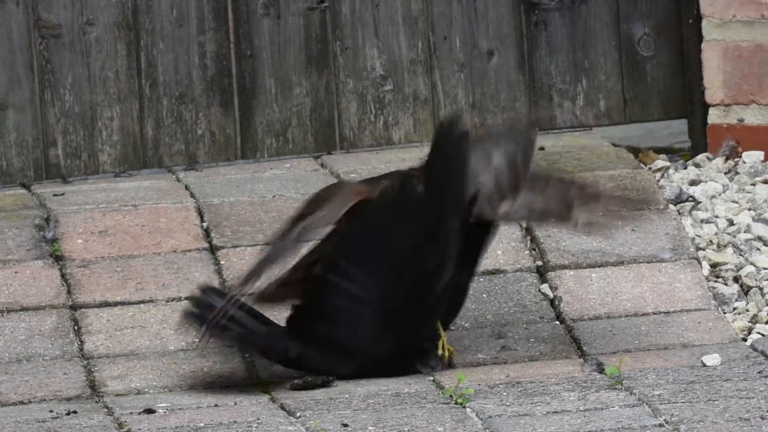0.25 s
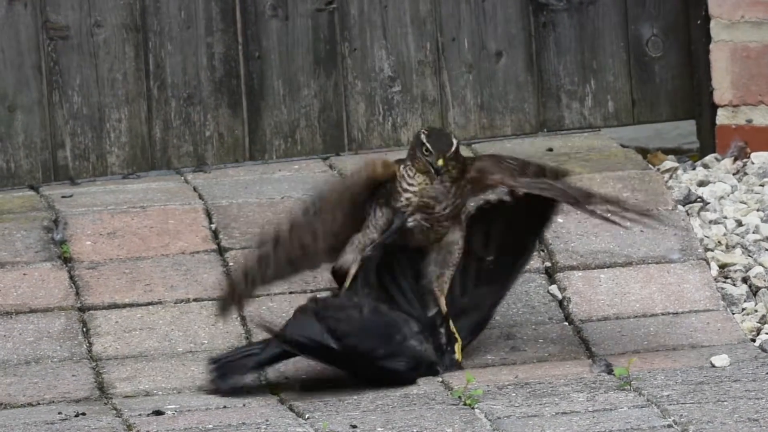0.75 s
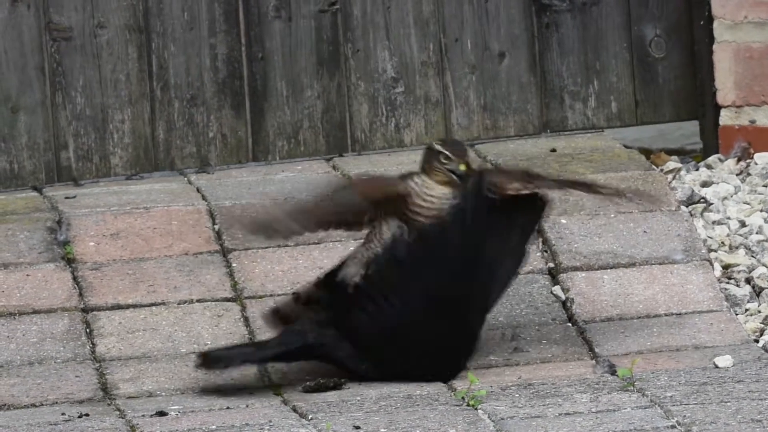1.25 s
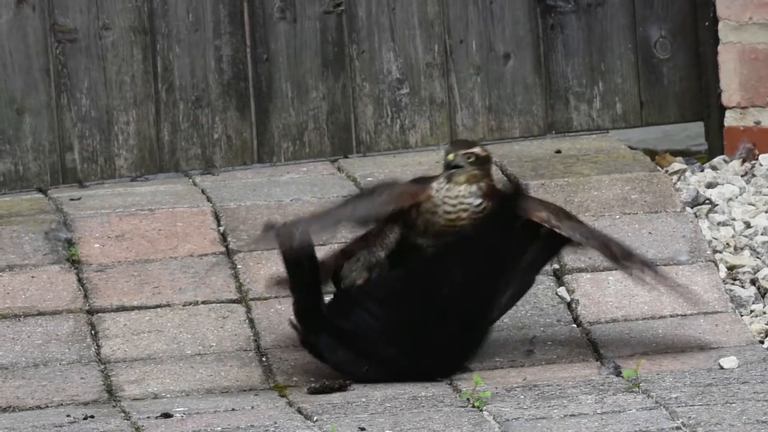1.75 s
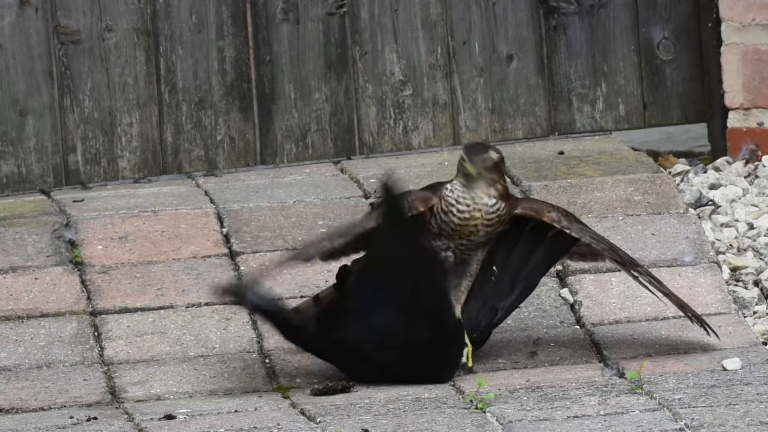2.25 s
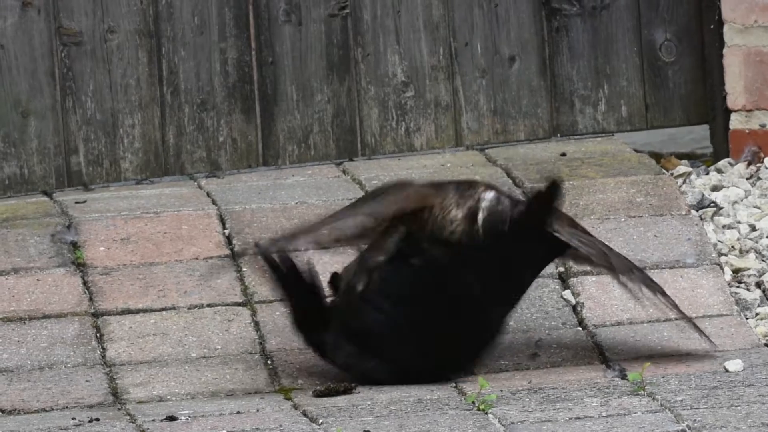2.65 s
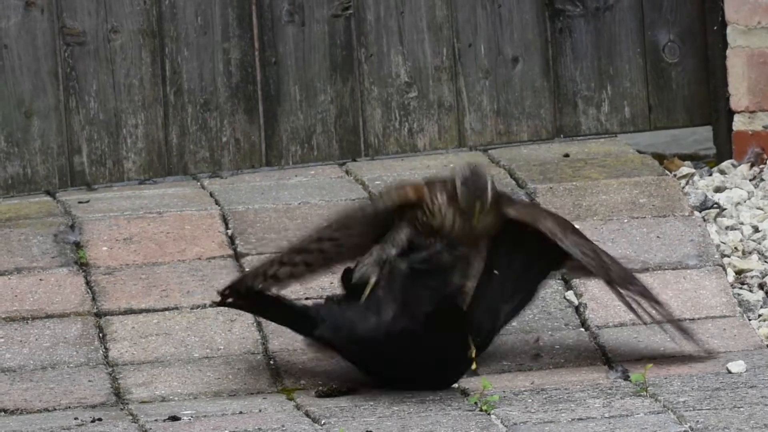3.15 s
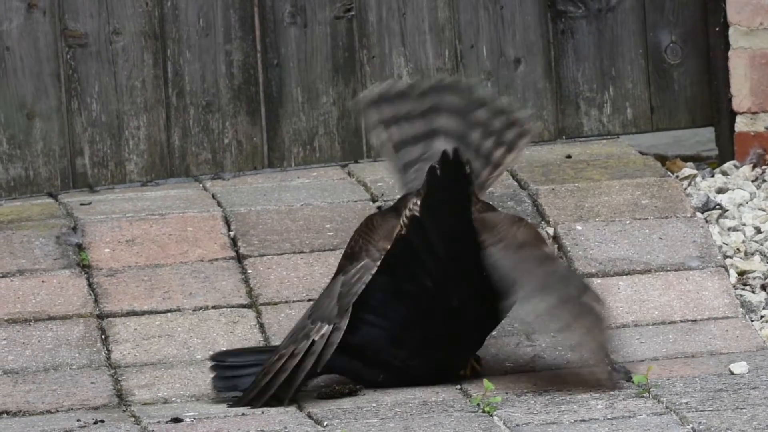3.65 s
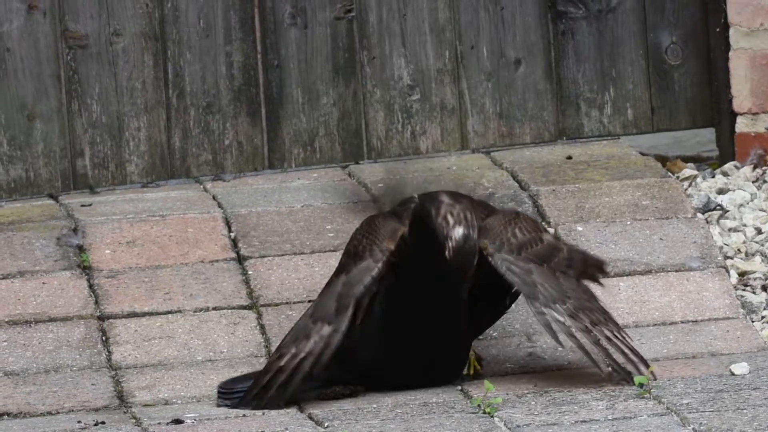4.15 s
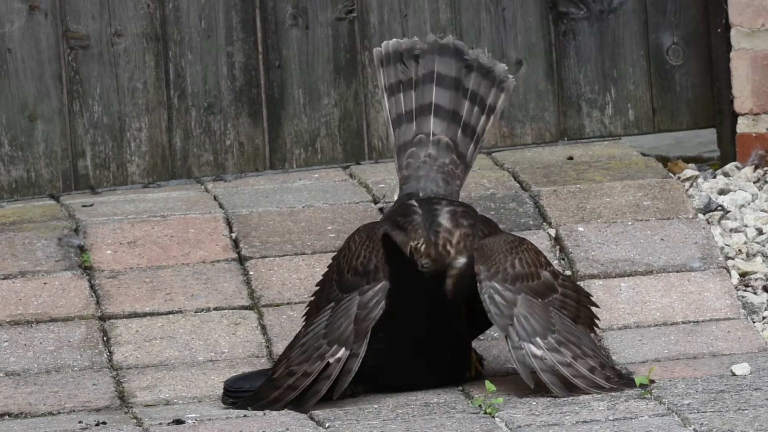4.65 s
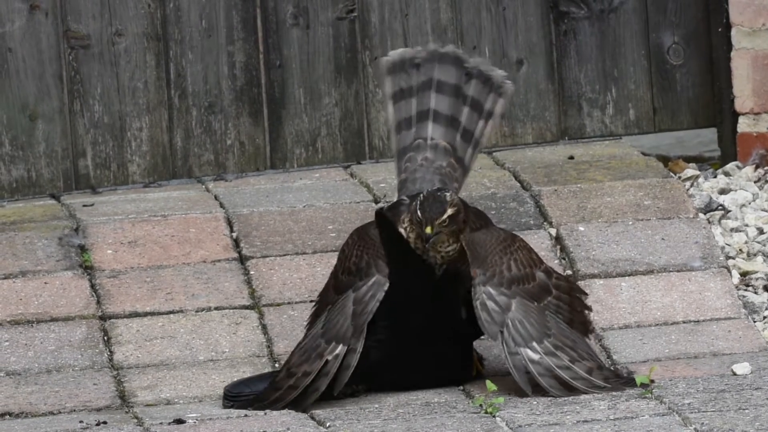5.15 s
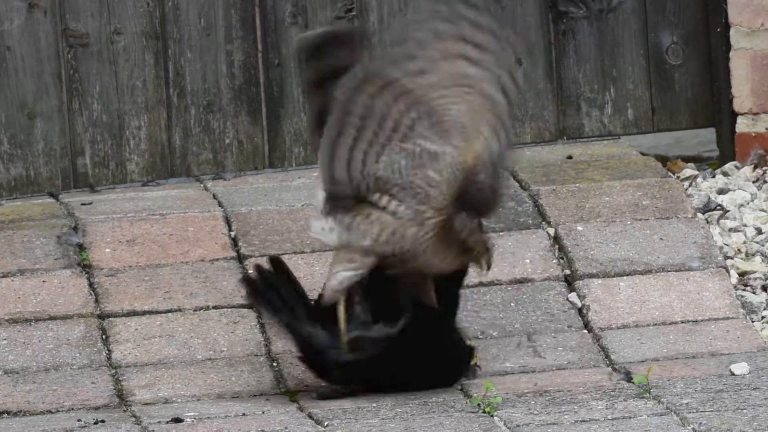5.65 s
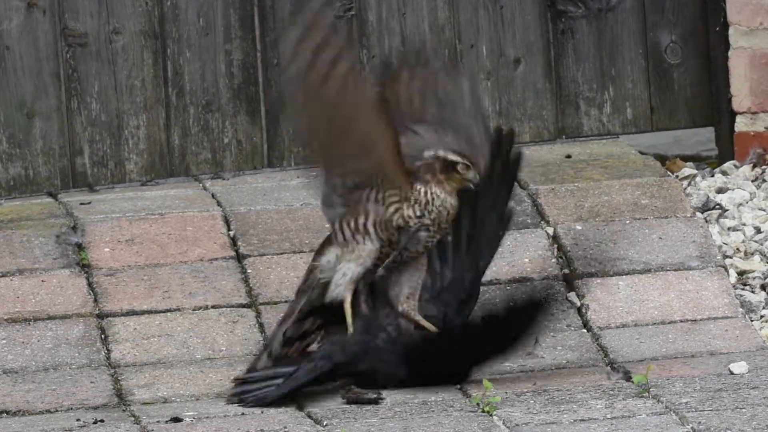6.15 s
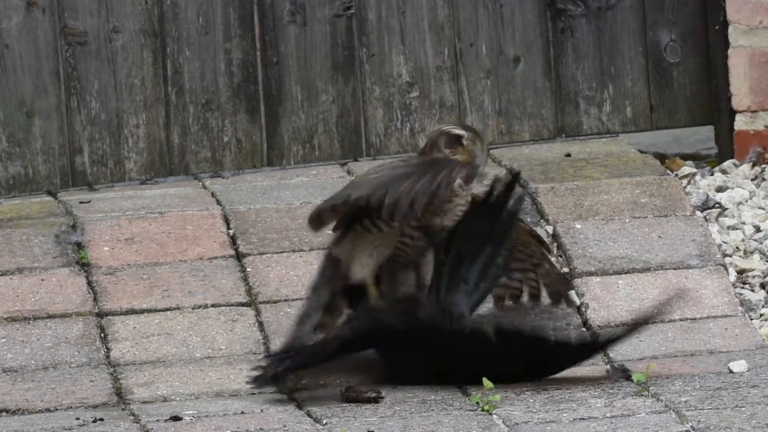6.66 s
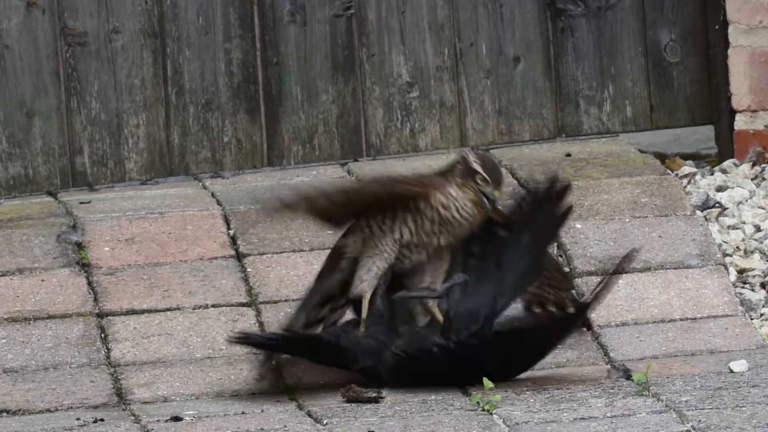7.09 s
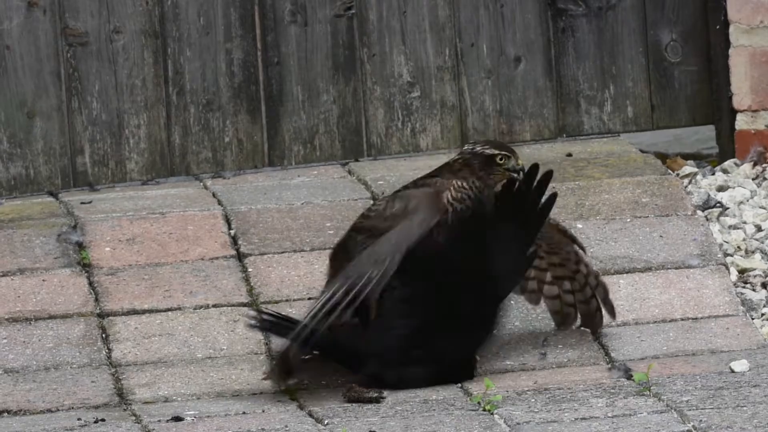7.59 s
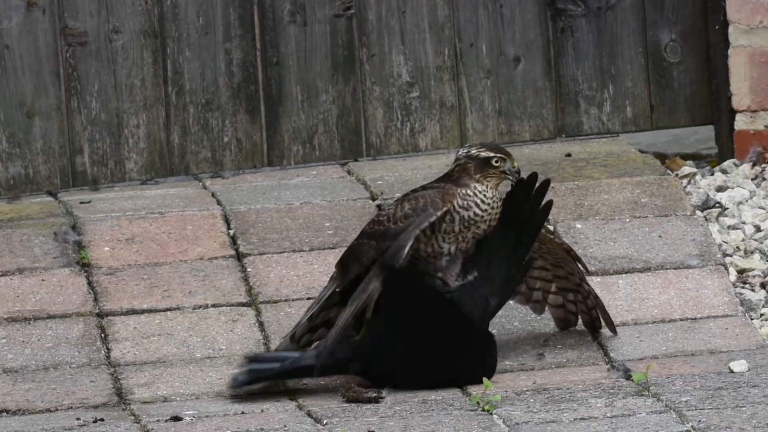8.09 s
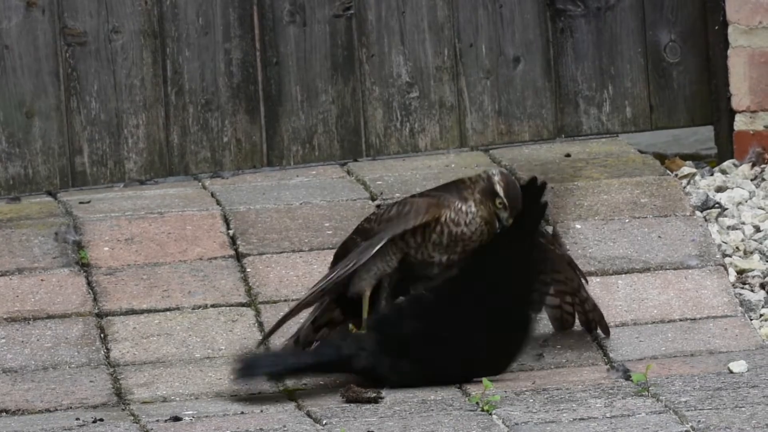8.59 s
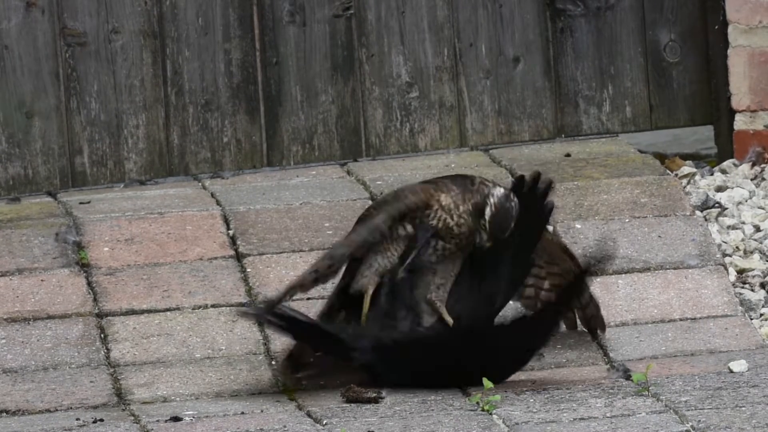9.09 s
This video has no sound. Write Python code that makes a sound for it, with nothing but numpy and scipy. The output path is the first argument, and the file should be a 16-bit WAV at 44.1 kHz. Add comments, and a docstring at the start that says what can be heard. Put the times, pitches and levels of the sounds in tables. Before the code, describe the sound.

A jackdaw pinned by a hawk screams harsh rasping caws about twice a second on a brick patio, while a pigeon coos briefly at first.

```python
"""Jackdaw under a hawk, brick patio

A jackdaw pinned by a hawk screams close to the microphone about twice a second: jittered membrane slaps
and hiss through moving resonances, each rasp able to lock into an arched note near its crest.
Paving, fence and house walls return delayed copies and scattered noise taps. A pigeon coos at first in gliding,
trembling tones; noise bursts make far birds and claw ticks; shaped noise makes wing scuffle and garden air,
and two wavering tones make a low hum."""
import sys
import numpy as np
from scipy import signal
from scipy.fft import rfft, irfft, next_fast_len
from scipy.io import wavfile
from scipy.ndimage import uniform_filter1d

SR = 44100
rng = np.random.default_rng(int(sys.argv[2]) if len(sys.argv) > 2 else 0)


def store_wav(level_fs):
    """Save 16-bit WAV to argv[1]."""
    pcm = np.round(np.clip(np.atleast_2d(level_fs), -1, 1) * 32767)
    wavfile.write(sys.argv[1], SR, pcm.T.astype(np.int16))


N = 411453
TIME = np.arange(N) / SR  # s

# Jackdaw caws: (start [s], rise to crest [s], hold after crest [s], effort at crest [dB],
#   swell up to crest [dB], gape at crest [0 narrow to 1 wide], time constant of beak opening [s],
#   nominal top pitch [Hz], clearness of note [0-1], strongest upper resonance before beak movement [Hz])
CAWS = [(-0.17, 0.15, 0.021, -23, 5.0, 1, 0.04, 352.0, 0.8, 4890),
        (0.215, 0.18, 0.041, -25.5, 6, 0.81, 0.013, 318.1, 0.6, 4740),
        (0.66, 0.17, 0.051, -25.5, 6.5, 1.12, 0.048, 344.8, 0.75, 4850),
        (1.127, 0.17, 0.046, -26, 6.7, 0.63, 0.055, 323.0, 0.85, 4813),
        (1.58, 0.18, 0.047, -28, 3, 0.59, 0.006, 315.2, 0.85, 4560),
        (2.079, 0.15, 0.01, -29, 7.5, 0.046, 0.023, 273.5, 0.6, 4736),
        (2.671, 0.17, 0.085, -25, 8.5, 1.03, 0.049, 348.9, 0.88, 4650),
        (3.172, 0.18, 0.044, -22.5, 13, 1.07, 0.086, 355.2, 0.93, 4676),
        (3.71, 0.15, 0.0125, -30, 4.5, 0.4, 0.02, 276, 0.4, 4700),
        (4.11, 0.18, 0.053, -27, 9, 0.77, 0.027, 314.9, 0.6, 4660),
        (4.643, 0.14, 0.03, -29.5, 16, 0.72, 0.14, 300.0, 0.2, 4480),
        (5.055, 0.18, 0.024, -27.5, 11.5, 0.73, 0.036, 311.7, 0.65, 4520),
        (5.559, 0.17, 0.064, -26, 10.3, 0.82, 0.049, 322.8, 0.9, 4825),
        (5.98, 0.16, 0.075, -25, 7, 1.122, 0.051, 352.7, 0.55, 4640),
        (6.437, 0.158, 0.021, -28.0, 5.3, 0.46, 0.044, 287.7, 0.55, 4730),
        (6.818, 0.09, 0.05, -28.5, 2, 0.64, 0.013, 318.3, 0.85, 4850),
        (6.925, 0.073, 0.052, -28.5, 1, 0.82, 0.005, 320.5, 0.88, 4900),
        (7.266, 0.16, 0.028, -27.5, 5.5, 0.85, 0.051, 305.3, 0.55, 4850),
        (7.708, 0.16, 0.015, -28, 12.5, 0.68, 0.041, 277, 0.5, 4590.0),
        (8.619, 0.092, 0.04, -33.5, 1.3, 0.26, 0.006, 298.9, 0.2, 4820),
        (8.945, 0.18, 0.044, -26.5, 8, 0.78, 0.038, 307.7, 0.85, 4762)]
# Throat and beak resonances before tuning:
#   (centre [Hz], width [Hz], level with narrow beak [dB], level with wide beak [dB])
THROAT = [(614.8, 154.4, 2, -7.5), (1050.3, 157, 6, 0.5), (1574, 391, 1.96, -4), (2066.5, 167, 5.5, 3.5),
          (2960, 410, -21, -14), (3550, 318, -26, -12.5), (4730, 303, -15.5, -10), (5590, 350, -45, -15),
          (7083, 311, -29, -14.5), (8030, 410, -49, -22), (9490, 370, -41.5, -26), (10580, 410, -50, -32),
          (12800, 530, -63, -44.5)]
# Returns off the near paving and fence: (delay [ms], gain [ratio])
NEAR_ECHOES = [(1.97, .24), (4.47, .3), (5.24, .24), (6.55, .12)]
# Ring of the yard: (frequency [Hz], time to fall 60 dB [s])
YARD = [(300, 0.29), (1000, 0.12), (2000, 0.22), (3500, 0.11), (5200, 0.19), (8010, 0.12), (13900, 0.15)]
# Pigeon coos: (start [s], hold [s], fade [s], nominal top pitch [Hz],
#   pitch fall by end of hold [Hz], level before trim [dB], level sag over hold [dB])
COOS = [(.176, .27, .035, 460.5, 25.7, -28, 2.5), (0.477, 0.17, 0.14, 448.2, 51, -26.5, 4),
        (1.103, 0.18, 0.043, 454, 10, -29, 6.5)]
# Birds far off: (start [s], length [s], centre [Hz], width [Hz], level [dB])
FAR_CALLS = [(1.746, 0.19, 510.5, 24.3, -52.5), (2.253, 0.24, 1270, 183, -55.5),
             (2.44, .19, 1346, 183, -54), (4.278, 0.17, 492, 84, -47), (5.895, 0.1, 535, 55, -61),
             (7.877, 0.21, 1235, 210, -60), (8.314, 0.23, 1296, 243.4, -77.5)]
# Claws and beaks on brick: (start [s], level before trim [dB], centre [Hz])
TICKS = [(2.0512, -46, 10200), (2.2538, -26.5, 3167), (7.5764, -47, 2925), (7.7484, -53.5, 4730),
         (9.303, -51.5, 3850)]
# Spectrum of moving feathers: (frequency [Hz], relative level [dB per Hz])
FEATHERS = [(40, -34.5), (120, -13), (235, -0.5), (410, -4), (610, -5.5), (1010, -18.5), (3100, -54.5),
            (11900, -45.5)]
# Spectrum of the garden air: (frequency [Hz], relative level [dB per Hz])
AIR = [(15, -71), (25, -14), (80, -49), (113, -13), (147, -30), (225, -11), (301, -47.5), (353, 1),
       (761, -32), (1330, -11.5), (2140, -25), (3020, -20.5), (4610, -25.5), (14000, -31.5)]
# Likeness of the two microphone ports: (frequency [Hz], correlation [0-1])
PORT_LIKENESS = [(450, 1), (1400, .968), (2800, .955), (5500, .93), (9000, .74), (14000, .72)]
# Flurries of wings and feathers on paving: (middle [s], length [s], level before trim [dB])
FLURRIES = [(.55, 1.2, -62.5), (1.25, 0.58, -64), (2.35, 0.38, -78), (4.24, 0.74, -74.5),
            (5.35, 0.27, -71.5), (6.5, 0.34, -69), (7.9, 0.509, -74), (9.15, .6, -73)]
# Swells of low hum: (middle [s], length [s], level before drift [dB])
HUM_SWELLS = [(.3, 1.3, -66.5), (2.35, 1, -75.5)]

# Effort in every caw: quick onset, droop during the hold, steady release
ATTACK_S, DROOP_DB, RELEASE_DB_PER_S = 0.013, 4, 362
# Gape at the start of a caw, and how fast it closes after the crest (gape units)
SHUT, CLOSING_PER_S = -0.59, 3.7
# Half-length of the locked note at clearness 0 and 1
HOARSE_HALF_S, CLEAR_HALF_S = 0.024, 0.06
UPPER_HZ = 4730  # strongest upper resonance with the throat tuned as in THROAT


def gain_of(db):
    """Decibels to amplitude."""
    return 10 ** (np.asarray(db) / 20)


def evened(x):
    """Scales to rms 1."""
    return x / np.sqrt(np.mean(x ** 2) + 1e-20)


def read(points, hz):
    """Interpolates a spectrum table on a log-frequency axis."""
    f, value = np.transpose(points)
    return np.interp(np.log(hz + 1), np.log(f + 1), value)


def add(mix, start, sound):
    """Mixes a sound in at its start time in seconds."""
    part = mix[max(round(start * SR), 0):][:len(sound)]
    part += sound[:len(part)]


def coloured(gain, size=N):
    """Noise of rms 1 whose spectrum is gain(Hz)."""
    padded = next_fast_len(size, real=True)
    spectrum = rfft(rng.standard_normal(padded))
    spectrum = spectrum * gain(np.fft.rfftfreq(padded, 1 / SR))
    return evened(irfft(spectrum, padded)[:size])


def wander(rate_hz):
    """Random drift of rms 1, mostly slower than the given rate."""
    return coloured(lambda hz: 1 / (1 + (hz / rate_hz) ** 4))


def resonance(hz, centre, width):
    """Gain of a steep-sided resonance."""
    return 1 / (1 + ((hz - centre) / (width / np.sqrt(2))) ** 2)


def swells(rows, rest_db):
    """A resting level with smooth humps on it."""
    level = np.full(N, gain_of(rest_db))
    for middle, length, db in rows:
        span = abs(TIME - middle) < length / 2
        hump = gain_of(db) * np.cos(np.pi * (TIME[span] - middle) / length) ** 2
        level[span] = np.maximum(level[span], hump)
    return level


def current_note():
    """Place in the latest caw's note (-1 start, 0 crest, 1 end), its top pitch, clearness and upper resonance."""
    start, rise, *_, top_hz, clearness, upper_hz = np.transpose(CAWS)
    crest, clearness = start + rise, np.clip(clearness, 0, 1)
    half = HOARSE_HALF_S + (CLEAR_HALF_S - HOARSE_HALF_S) * clearness
    note = np.searchsorted(start[1:], TIME)
    along = (TIME - crest[note]) / half[note]
    return along, top_hz[note], clearness[note], upper_hz[note]


def syrinx(rasp_jitter=0.26):
    """Membranes slap chaotically, then lock into a note that arches and falls; air hisses at each opening."""
    sag, note_jitter, shimmer = 0.075, 0.007, 0.36
    note_air, rasp_air = 0.012, 0.36  # hiss in the clear note, and added in the rasp
    along, top_hz, clearness, _ = current_note()
    rough = 1 - clearness ** 0.22 / (1 + ((along - 0.15) / 1.5) ** 6)
    pitch = top_hz * (1 - sag * np.minimum(along ** 2, 2.6))
    jitter = (note_jitter + rasp_jitter * rough) * wander(240)
    turns = np.cumsum(pitch * np.exp(jitter)) / SR
    # each slap lands slightly off its beat, which blurs the high harmonics
    turns = turns + 0.008 * wander(260)
    slaps = evened(np.sinc((turns % 1 - 0.5) * SR / pitch * 0.7))
    slaps = evened((slaps - slaps.mean()) * np.exp(shimmer * rough * wander(260)))
    # a burst of hiss follows each slap
    puffs = evened(np.exp(-((turns - 0.5) % 1) / 0.68) * rng.standard_normal(N))
    air = note_air + rasp_air * rough
    return np.sqrt(1 - air) * slaps + np.sqrt(air) * puffs


def throat(source, gape, low_cut_hz=470, relax_db=3.5):
    """The gaping beak lifts and raises the upper resonances; the lowest one swells as each note falls."""
    hz, t, z = signal.stft(source, SR, nperseg=512, noverlap=384)
    hz, gape = hz[:, None], np.interp(t, TIME, gape)
    along, _, _, upper_hz = current_note()
    falling = np.interp(t, TIME, np.clip(along, -1, 1))
    # the upper resonances shift together from caw to caw as the neck twists, and follow the beak
    tuning = np.interp(t, TIME, upper_hz / UPPER_HZ + 0.008 * wander(5))
    tuning = tuning + 0.035 * (gape - 0.7)
    # the resonances between 1.5 and 4 kHz rise as the beak opens
    beak_tuning = 1 + 0.04 * (gape - 0.8) + 0.02 * np.interp(t, TIME, wander(4))
    power, lag = 0, 0
    for centre, width, narrow_db, wide_db in THROAT:
        db = narrow_db + gape * (wide_db - narrow_db)
        if centre == THROAT[0][0]:
            db = db + relax_db * falling
        moving = centre * (tuning if centre > 4000 else beak_tuning if centre > 1500 else 1)
        power = power + (resonance(hz, moving, width) * gain_of(db)) ** 2
        # each resonance rings on, which spreads a slap over its whole cycle
        lag = lag + 4 * np.arctan((hz - centre) / (width / 2))
    low_cut = hz ** 4 / (hz ** 4 + low_cut_hz ** 4)
    z = z * np.sqrt(power) * np.exp(-1j * lag) * low_cut
    return signal.istft(z, SR, nperseg=512, noverlap=384)[1][:N]


def caw(t, rise, hold, crest_db, swell_db, widest, opening):
    """Effort and gape both grow to the crest, then the breath gives out and the beak closes."""
    past = np.maximum(t - rise, 0)
    db = crest_db - swell_db * np.maximum(1 - t / rise, 0)
    db = db - DROOP_DB * np.minimum(past / hold, 1) ** 2
    db = db - RELEASE_DB_PER_S * np.maximum(past - hold, 0)
    effort = gain_of(db) * (1 - np.exp(-t / ATTACK_S)) ** 1.5
    opened = np.minimum(np.expm1(-t / opening) / np.expm1(-rise / opening), 1)
    gape = SHUT + (widest - SHUT) * opened - CLOSING_PER_S * past
    return effort, gape


def jackdaw(level_db=0, quiver_hz=35):
    """Each caw starts with the beak nearly shut; a quivering effort sets the strength of the voice's main band."""
    longest_s, quiver_db = 0.4, 1.1
    effort, gape = np.zeros(N), np.full(N, SHUT)
    for start, *shape, _, _, _ in CAWS:
        span = (TIME > start) & (TIME < start + longest_s)
        caw_effort, caw_gape = caw(TIME[span] - start, *shape)
        effort[span] = np.maximum(effort[span], caw_effort)
        gape[span] = np.maximum(gape[span], caw_gape)
    voice = throat(syrinx(), np.clip(gape, -0.9, 1.3))
    voice = voice + sum(gain * np.roll(voice, round(ms * SR / 1000)) for ms, gain in NEAR_ECHOES)
    # level the main band over 25 ms, so that effort alone sets its strength
    main_band = signal.butter(3, [800, 2600], "band", fs=SR, output="sos")
    body = signal.sosfiltfilt(main_band, voice)
    voice = voice / np.sqrt(uniform_filter1d(body ** 2, size=1100) + 1e-12)
    return gain_of(level_db + quiver_db * wander(quiver_hz)) * voice * effort


def scuffle(beat_hz=8, level_db=6.0):
    """Feathers push air in uneven beats."""
    beat_db, rustle_db = 3.5, -79.5  # rustle between the flurries, before the level trim
    beats = gain_of(level_db + beat_db * wander(beat_hz))
    rush = coloured(lambda hz: gain_of(read(FEATHERS, hz)))
    return swells(FLURRIES, rustle_db) * beats * rush


def garden(swell_db=1, waver=0.026, hum_drift_db=2, octave_db=-5):
    """Quiet outdoor air as shaped noise, and a low wavering hum of a tone and its octave."""
    air_db, hum_hz, hum_rest_db = -73.5, 119, -88.5  # middle values, before drift
    air = coloured(lambda hz: gain_of(read(AIR, hz)))
    air = gain_of(air_db + swell_db * wander(2.3)) * air
    phase = 2 * np.pi * hum_hz * np.cumsum(1 + waver * wander(22)) / SR
    hum_level = swells(HUM_SWELLS, hum_rest_db) * gain_of(hum_drift_db * wander(2))
    return air + hum_level * (np.sin(phase) + gain_of(octave_db) * np.sin(2 * phase))


def pigeon(overtone_db=-47, level_db=-0.5, wall_db=-8, fade_db=24):
    """Nearly pure, trembling coos that scoop up, hold and sink, repeated by a house wall."""
    waver, wall_s, tremble_db = 0.014, 0.085, 1.8
    attack_s, scoop_hz, scoop_s = 0.0086, 130, 0.014  # every coo scoops up to its pitch
    out, drift = np.zeros(N), 1 + waver * wander(50)
    for start, hold, fade, top_hz, fall_hz, db, sag_db in COOS:
        t = TIME[TIME < hold + 2 * fade]
        hz = top_hz - scoop_hz * np.exp(-t / scoop_s)
        hz = hz - fall_hz * np.minimum((t / hold) ** 2, 2.3)
        phase = 2 * np.pi * np.cumsum(hz * drift[:len(t)]) / SR
        fading_db = fade_db * (np.maximum(t - hold, 0) / fade) ** 2
        swell = (1 - np.exp(-(t / attack_s) ** 2)) * gain_of(db - sag_db * t / hold - fading_db)
        tone = np.sin(phase) + gain_of(overtone_db) * np.sin(2 * phase)
        add(out, start, np.sqrt(2) * swell * tone)
    out = out * gain_of(tremble_db * wander(40))
    wall = gain_of(wall_db) * np.roll(out, round(wall_s * SR))
    return gain_of(level_db) * (out + wall)


def far_birds():
    """Distance smears each call into a soft swell around its strongest resonance."""
    out = np.zeros(N)
    for start, length, centre, width, db in FAR_CALLS:
        size = int(length * SR)
        call = coloured(lambda hz: resonance(hz, centre, width), size)
        add(out, start, gain_of(db) * call * signal.windows.tukey(size, 0.8))
    return out


def ticks(t60=0.023, spread=0.041, level_db=-3):
    """Short dry clicks of claw and beak, each a narrow band of noise dying away."""
    out, t, attack_s = np.zeros(N), TIME[:2048], 0.0006
    for start, db, centre in TICKS:
        ring = coloured(lambda hz: resonance(hz, centre, spread * centre), len(t))
        decay = gain_of(db + level_db - 60 * t / t60)
        add(out, start, decay * np.minimum(t / attack_s, 1) * ring)
    return out


def yard(x, gap_s=0.01, dull_hz=6400):
    """Scattered returns from walls and fences, dulled in the treble, each band dying at its own rate."""
    # about 3000 returns a second
    taps = rng.standard_normal(SR) * (rng.random(SR) < 3000 / SR) * (TIME[:SR] > gap_s)
    hz, t, z = signal.stft(taps, SR, nperseg=256)
    z = z * gain_of(-60 * t / read(YARD, hz)[:, None])
    z = z / np.sqrt(1 + (hz[:, None] / dull_hz) ** 2)
    tail = signal.istft(z, SR, nperseg=256)[1]
    # unit gain from 500 to 3000 Hz
    midrange = abs(rfft(tail, SR)[500:3000])
    return signal.fftconvolve(x, tail / np.sqrt(np.mean(midrange ** 2)))[:N]


def ports(x, scatter_s=0.021):
    """Two close microphone ports: alike in the bass, drifting apart towards the treble."""
    same = np.clip(read(PORT_LIKENESS, np.fft.rfftfreq(N, 1 / SR)), 0, 1)
    scatter = rng.standard_normal(SR) * np.exp(-TIME[:SR] / scatter_s)
    side = signal.fftconvolve(x, scatter / np.linalg.norm(scatter))[:N]
    side = irfft(rfft(side) * np.sqrt((1 - same) / (1 + same)), N)
    return np.array([x + side, x - side])


def scene(coo_wet_db=-14):
    """The struggle close by, the other birds and the garden behind it."""
    near_wet_db = -9
    near, coos = jackdaw() + ticks(), pigeon()
    returns = yard(gain_of(near_wet_db) * near + gain_of(coo_wet_db) * coos)
    return ports(near + coos + returns + far_birds() + scuffle() + garden())


def record(dry):
    """The recorder's band limit: a steep low-pass on both channels."""
    edge_hz = 14150
    low_pass = signal.firwin(255, edge_hz, window=("kaiser", 8), fs=SR)
    return signal.oaconvolve(dry, low_pass[None], "same")


dry = scene()
out = record(dry)
store_wav(out)
```